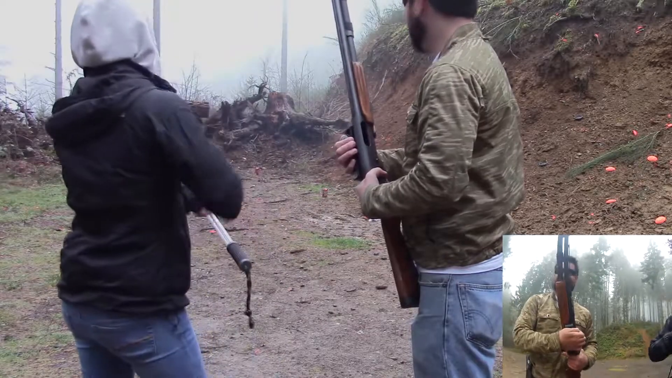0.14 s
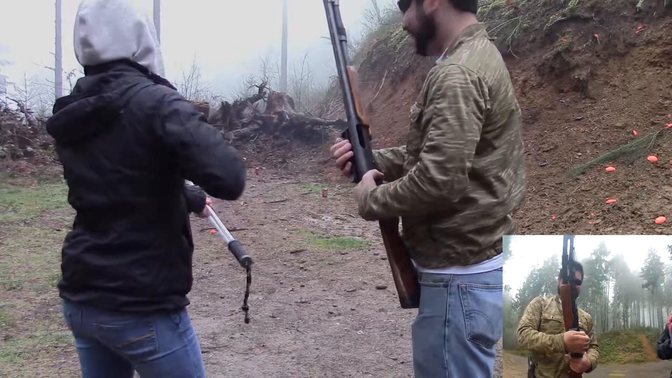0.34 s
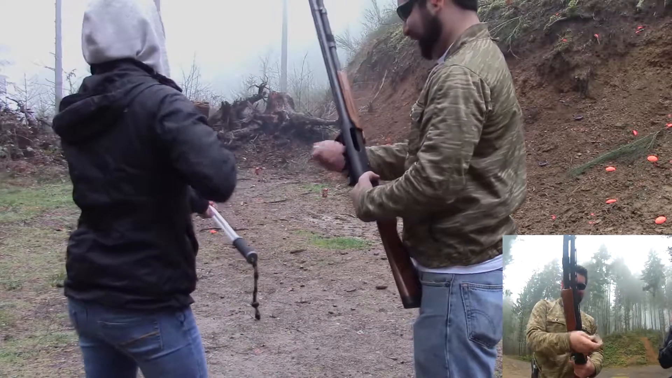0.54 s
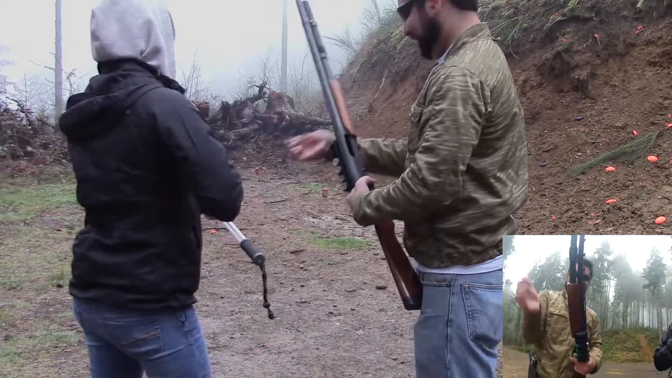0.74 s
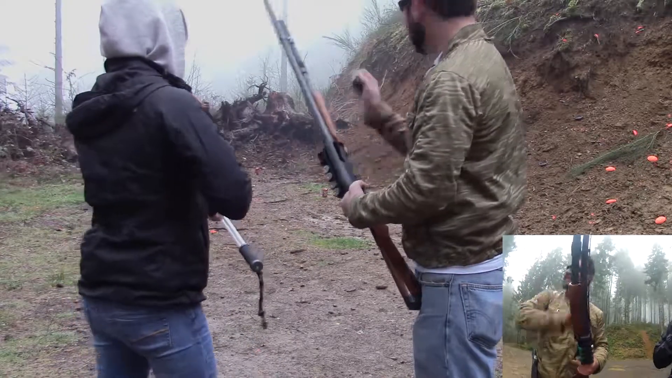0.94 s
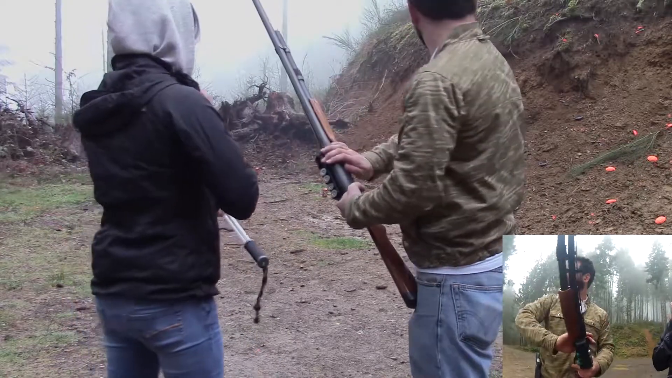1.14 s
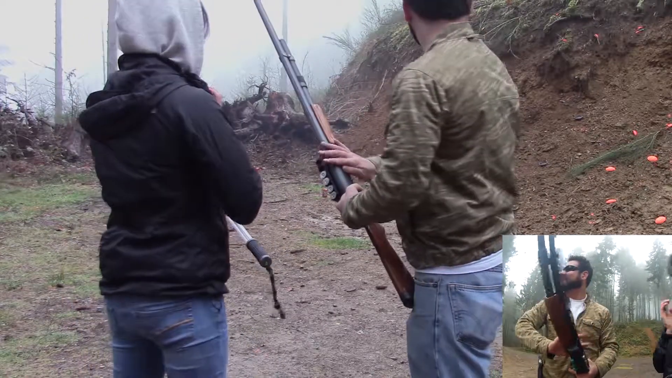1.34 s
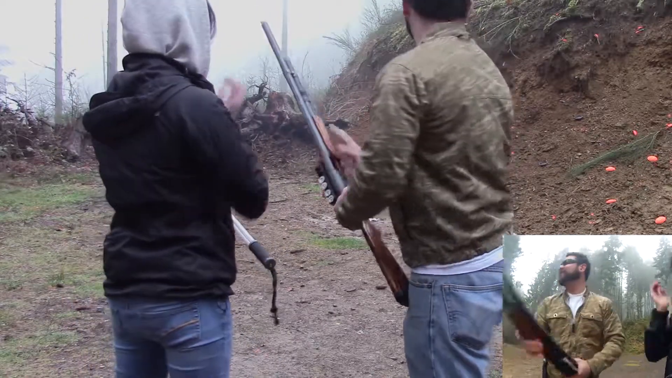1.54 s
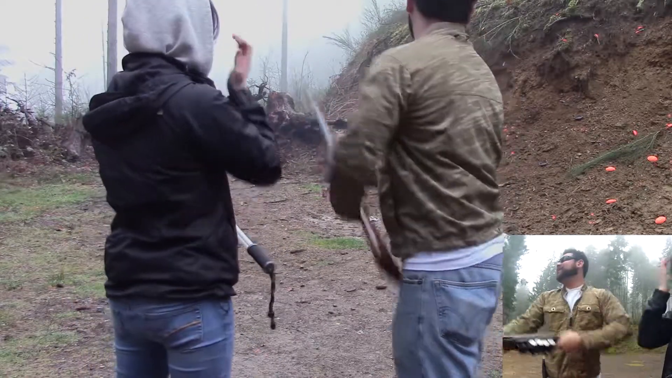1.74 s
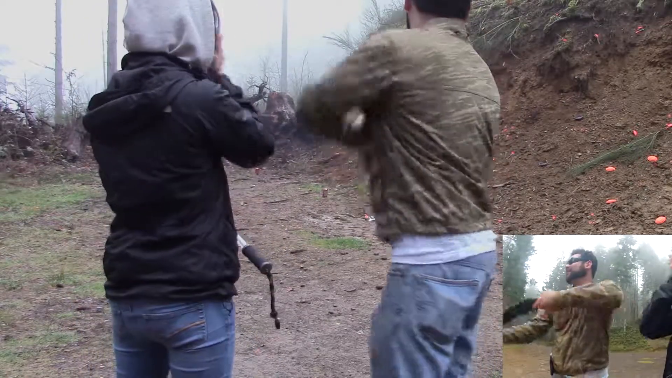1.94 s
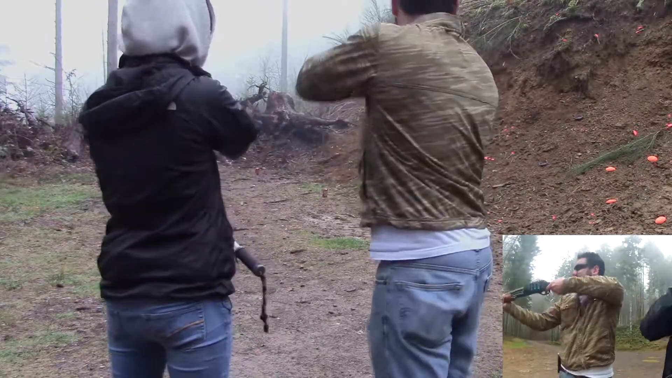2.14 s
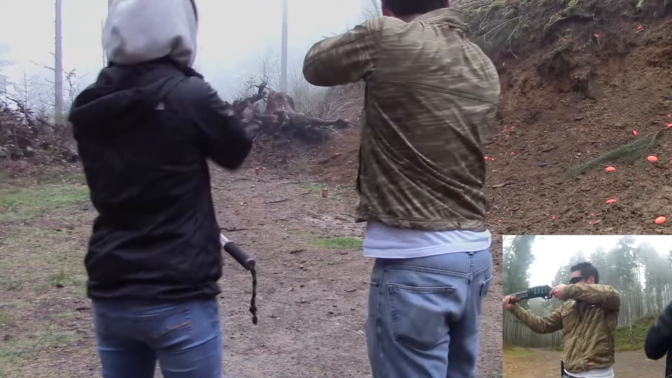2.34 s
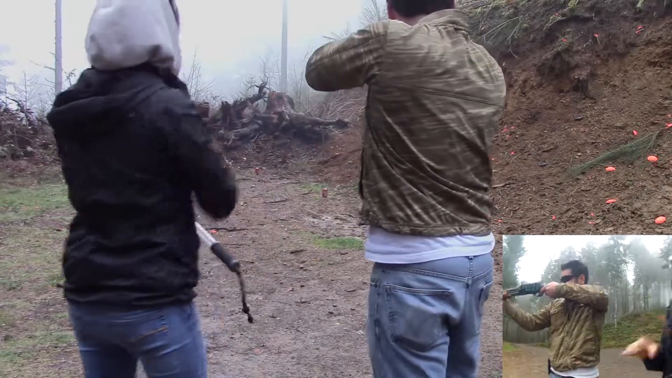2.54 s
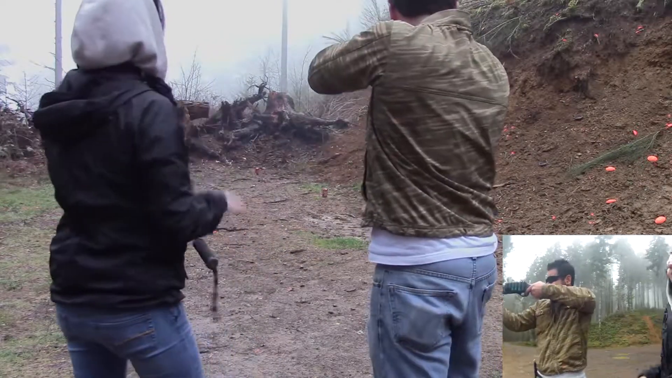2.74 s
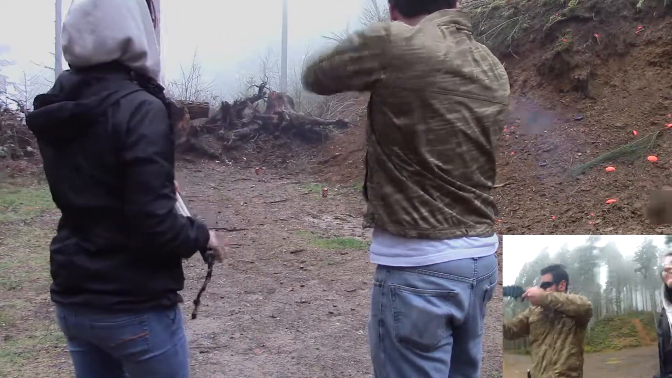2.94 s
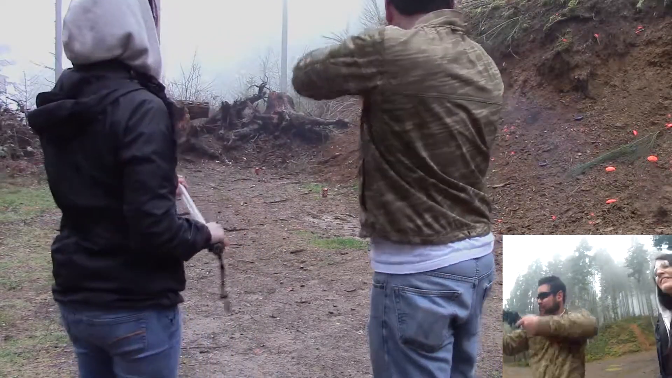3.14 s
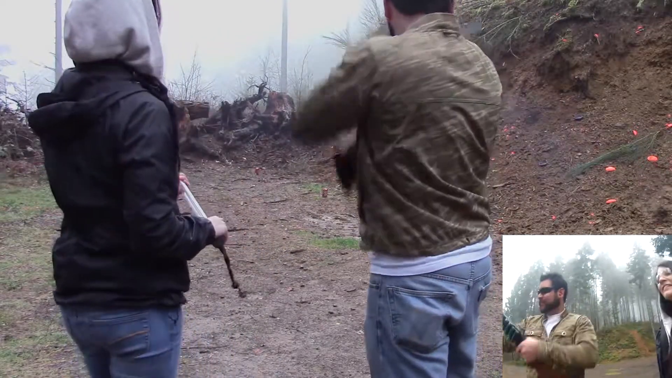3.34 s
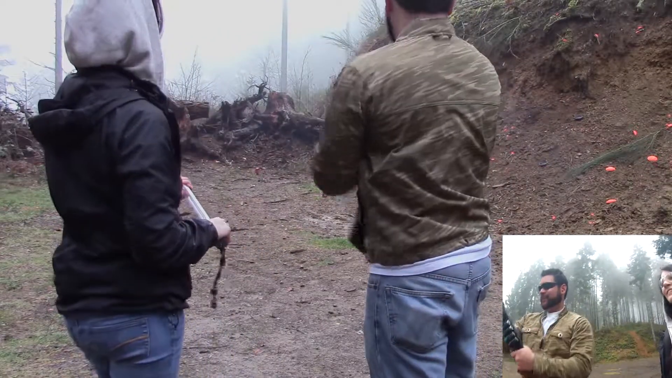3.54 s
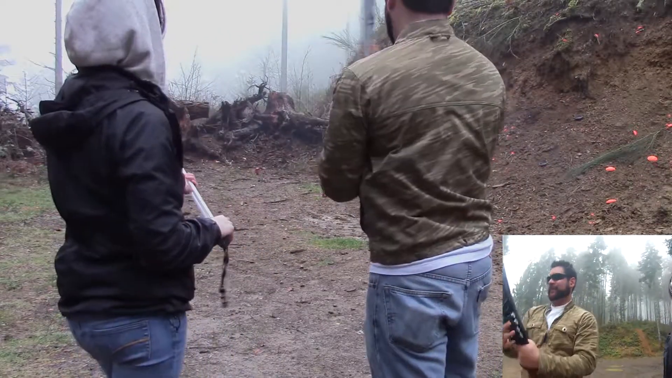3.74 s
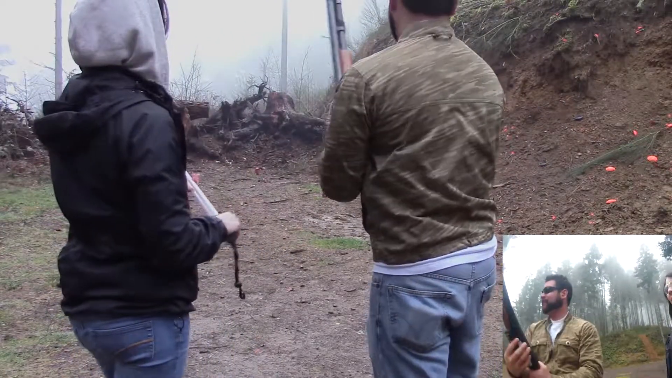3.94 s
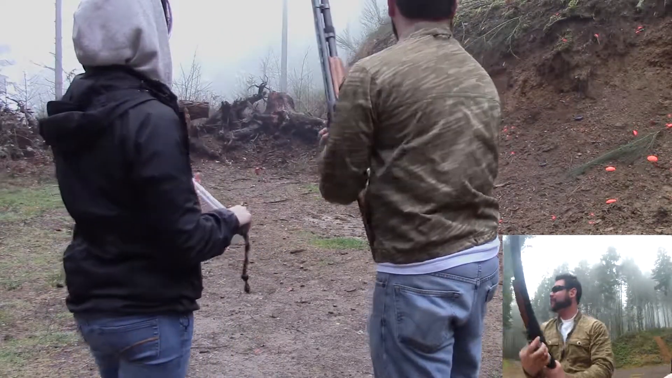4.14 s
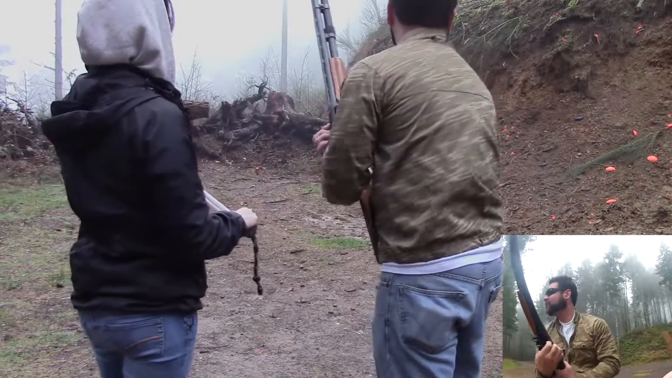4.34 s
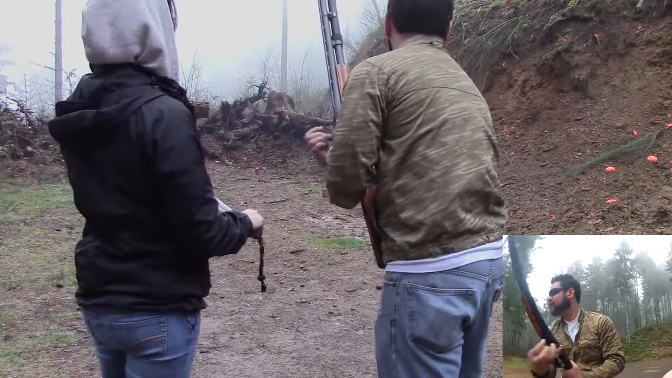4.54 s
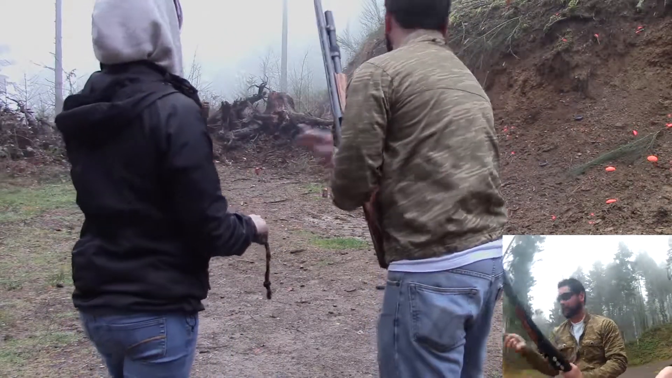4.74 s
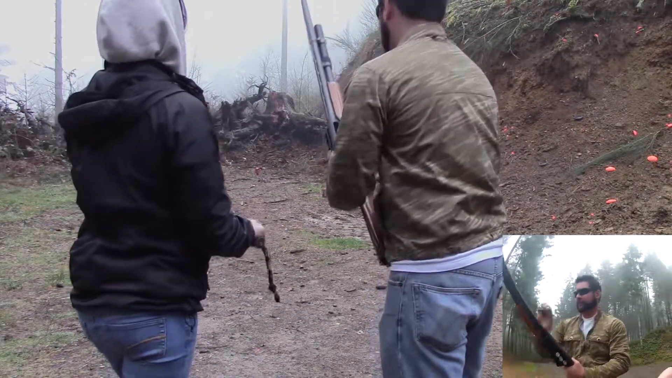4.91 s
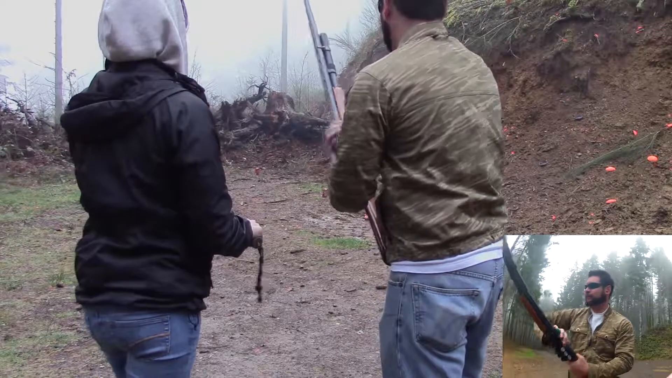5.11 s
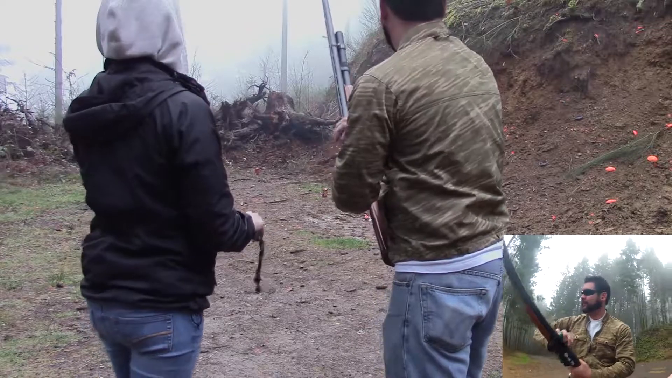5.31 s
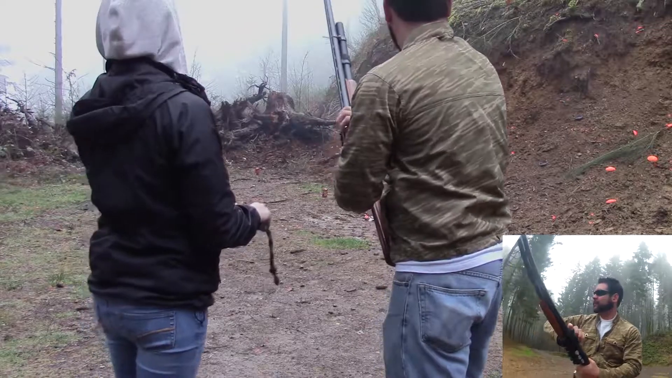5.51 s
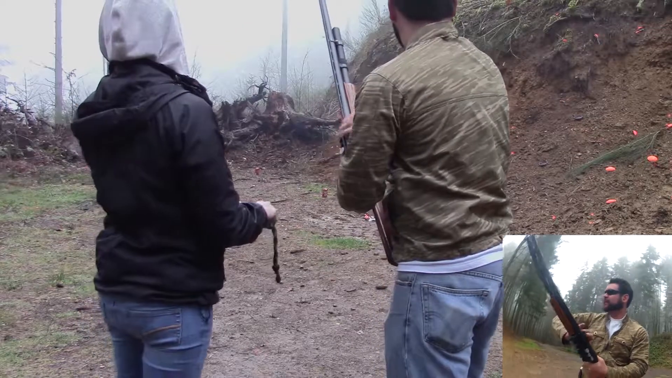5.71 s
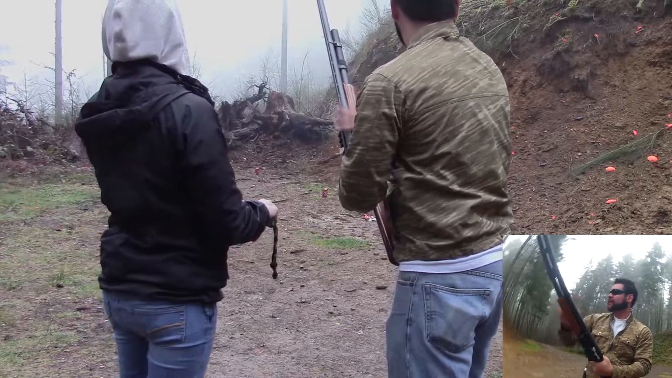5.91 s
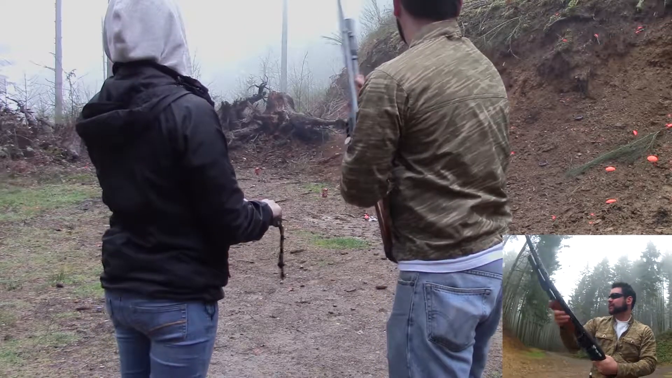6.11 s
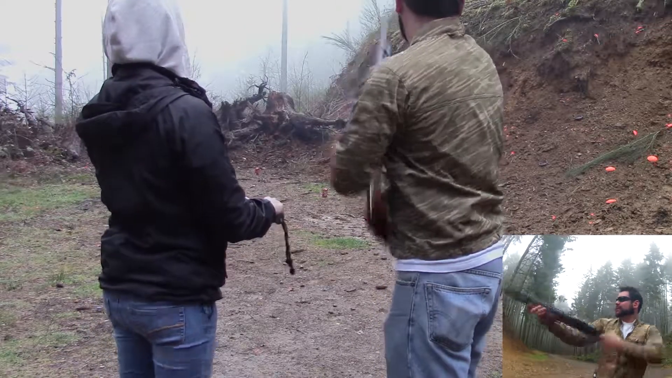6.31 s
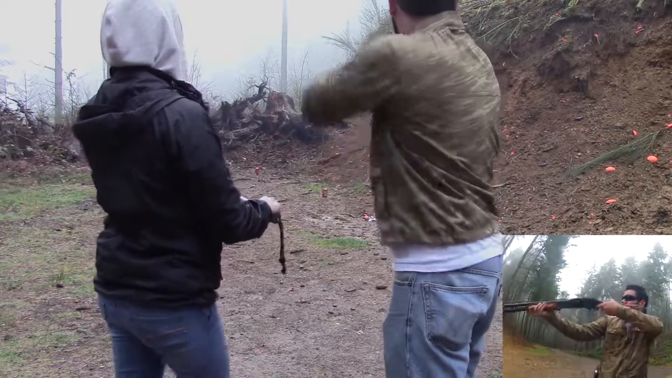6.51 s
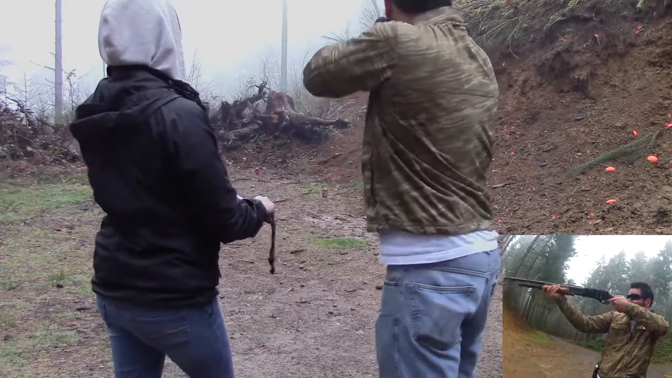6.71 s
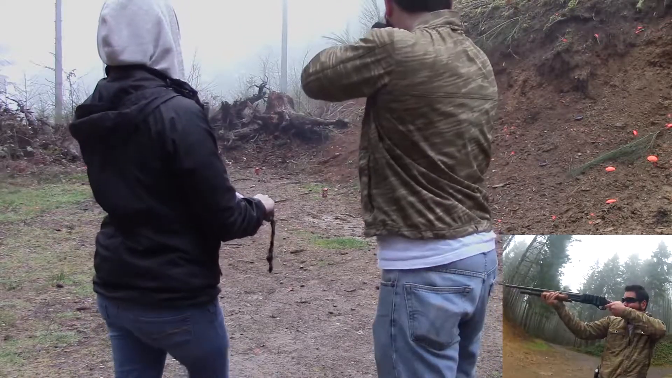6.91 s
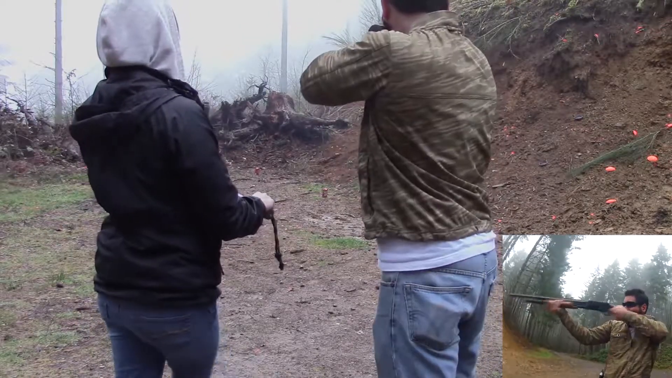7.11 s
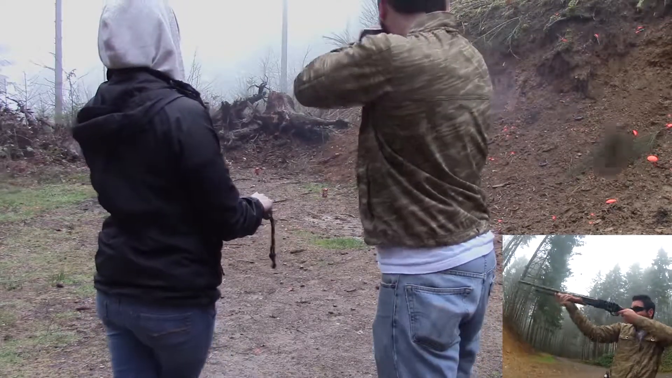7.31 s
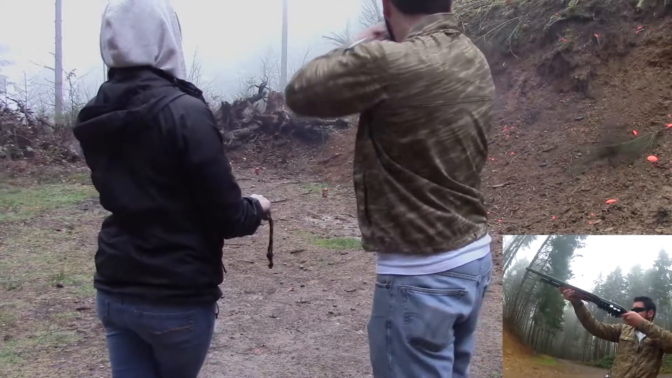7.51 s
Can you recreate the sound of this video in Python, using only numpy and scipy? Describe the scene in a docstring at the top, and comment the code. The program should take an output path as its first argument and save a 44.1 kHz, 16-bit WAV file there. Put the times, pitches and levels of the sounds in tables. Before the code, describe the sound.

In a quiet forest clearing, a pump shotgun is loaded with steel clicks and slammed shut. A jacket brushes faintly, then a blast overloads the microphone a few metres away and rolls off through the trees. The pump clacks open, more clicks and scrapes follow, and the action slams shut again before a second blast. A soft hush of air and leaves lies underneath.

```python
"""Two pump shotgun blasts in a forest clearing, a few metres away. Each overloads the microphone,
slaps back from the ground, an earth bank and trunks, and rolls off through the trees.
Around the shots the gun is loaded and racked: steel parts clack, scrape and ring, the whole gun
thumps, and a jacket brushes as it is shouldered. A quiet hush of air and leaves lies underneath."""
import sys
import numpy as np
from scipy import signal
from scipy.fft import rfft, irfft
from scipy.io import wavfile
from scipy.ndimage import uniform_filter1d

SR = 44100
rng = np.random.default_rng(int(sys.argv[2]) if len(sys.argv) > 2 else 0)


def unload_wav(signal):
    """Save mono or channel-first audio to the path in sys.argv[1] as 16-bit WAV at rate SR, clipped to [-1, 1]."""
    wavfile.write(
        sys.argv[1],
        SR,
        np.round(np.clip(np.atleast_2d(signal).T, -1, 1) * 32767).astype(np.int16),
    )


N = 333396
T = np.arange(N) / SR


def undb(db):
    """dB to gain."""
    return 10 ** (np.asarray(db) / 20)

def unit(x):
    """Scale to rms 1."""
    return x / np.sqrt(np.mean(x ** 2))

def colour(x, points):
    """Minimum-phase filter through (frequency [Hz], gain [dB]) points."""
    hz, db = np.transpose(points)
    size = 8192
    bins_hz = np.maximum(np.arange(size // 2 + 1) * SR / size, 1)
    cepstrum = irfft(np.interp(np.log(bins_hz), np.log(hz), db) * np.log(10) / 20)
    cepstrum[1:size // 2] *= 2
    cepstrum[size // 2 + 1:] = 0
    return signal.fftconvolve(x, irfft(np.exp(rfft(cepstrum))))[:len(x)]

def band(x, lo_hz, hi_hz):
    """Butterworth band-pass."""
    return signal.sosfilt(signal.butter(2, [lo_hz, hi_hz], "band", fs=SR, output="sos"), x)

def noises(*spectra):
    """One independent noise per spectrum, rms 1."""
    return np.array([unit(colour(rng.standard_normal(N), points)) for points in spectra])

def wander(rate_hz):
    """Random steps, smoothed twice."""
    hold = int(SR / rate_hz)
    steps = np.repeat(rng.standard_normal(N // hold + 1), hold)
    return 0.88 * uniform_filter1d(uniform_filter1d(steps, hold), hold)[:N]

def register_gains(hits):
    """Bass, mid and treble gain of each hit."""
    return [undb([bass_db, 0, treble_db]) for _, _, bass_db, treble_db, *_ in hits]

def bursts(hits, weights, rise_s, hold_share=0.1):
    """Rise, hold for a share of t60, decay: one envelope per weight column; powers add."""
    power = np.zeros((len(weights[0]), N))
    for (time_s, db, _, _, t60_s, *_), gains in zip(hits, weights):
        start = int((time_s - rise_s) * SR)
        hold_s = hold_share * t60_s
        t = T[:min(int(SR * (hold_s + 2 * t60_s)), N - start)]
        shape = np.minimum(t / rise_s, 1) * undb(db - 60 * np.maximum(t - rise_s - hold_s, 0) / t60_s)
        power[:, start:start + len(t)] += np.outer(gains, shape) ** 2
    return np.sqrt(power)

def envelopes(curves, fade_s):
    """Sum of gated (time [s], level [dB], ...) curves: one gain envelope per level column."""
    out = 0
    for times_s, *levels_db in map(np.transpose, curves):
        gate = np.clip(np.minimum(T - times_s[0], times_s[-1] + fade_s - T) / fade_s, 0, 1)
        out = out + gate * undb([np.interp(T, times_s, db) for db in levels_db])
    return out


# Air and leaves: (frequency [Hz], density [dB])
HUSH_SPECTRUM = [(18, -39.5), (30, -11), (81, -7.5), (192, -6), (237, -7), (342, -9.5), (445, -8),
                 (481, -18), (534, -10), (676, -11), (1110, -21.5), (1440, -21.5), (1740, -23),
                 (4690, -26.5), (15600, -37)]
def hush(level_db=-57.5):
    """Far air and leaves, wavering slightly."""
    return undb(level_db + wander(17)) * noises(HUSH_SPECTRUM)[0]

# Jacket swish: (time [s], level [dB])
JACKET_LEVELS = [(2.46, -59.5), (2.56, -55.5), (2.62, -51.5), (2.65, -58), (2.73, -60), (2.83, -60.5)]
# Rubbing cloth: (frequency [Hz], density [dB])
JACKET_SPECTRUM = [(300, -2), (1500, -1.5), (3000, -4.5), (5000, -3.5), (9000, -10), (14000, -19)]
def jacket():
    """Cloth brushes with a crumbly swish as the gun is shouldered."""
    crumple = undb(2.4 * wander(60) + 3.7 * wander(330))
    return crumple * envelopes([JACKET_LEVELS], fade_s=0.0206)[0] * noises(JACKET_SPECTRUM)[0]

def clearing(x, gain_db=-22.5, split_hz=5140, body_t60_s=1, treble_t60_s=0.6):
    """Diffuse return from bank and trunks; the treble dies first."""
    t = T[:SR]
    low, high = rng.standard_normal((2, SR)) * np.clip(t / 0.038, 0, 1)
    body = band(low, 270, split_hz) * undb(-60 * t / body_t60_s)
    treble = band(high, split_hz, 12000) * undb(4.5 - 60 * t / treble_t60_s)
    tail = body + treble
    return undb(gain_db) * signal.fftconvolve(x, tail / np.sqrt(np.sum(tail ** 2)))[:N]

def duck(x, half_gain_at_db=-15, recovery_s=0.0047):
    """Gain that dips briefly after peaks of x."""
    pole = np.exp(-1 / (recovery_s * SR))
    level = signal.lfilter([1 - pole], [1, -pole], np.abs(x))
    return 1 / (1 + level / undb(half_gain_at_db))

def loud_stereo_noise(x, full_scale_db=-25, exponent=2.6):
    """Faint noise that differs between the channels and rises steeply with loudness."""
    power = uniform_filter1d(np.clip(x, -1, 1) ** 2, size=400) + 1e-12
    return undb(full_scale_db) * unit(band(rng.standard_normal(N), 30, 9000)) * power ** (exponent / 2)

# Jolts of the whole gun: (time [s], level [dB], t60 [s])
JOLTS = [(1.766, -25, 0.051), (3.652, -18.5, 0.019), (3.922, -39, 0.047), (4.121, -40, 0.045),
         (5.799, -40, 0.15), (6.247, -38, 0.037)]
def thumps(pitch_hz=75.5):
    """Each slam or bump gives a damped push of air."""
    out = np.zeros(N)
    for time_s, db, t60_s in JOLTS:
        t = np.maximum(T - time_s, 0)
        out += 1.8 * undb(db - 60 * t / t60_s) * np.sin(2 * np.pi * pitch_hz * t)
    return out

# Spells of handling: (start [s], end [s], level [dB])
HANDLING = [(2.52, 2.74, -53), (3.8, 4.02, -39), (4.38, 4.8, -45), (5.17, 5.35, -44), (6.5, 6.7, -47)]
def ticks(per_spell=8, scatter_db=5, treble_db=-5, t60_s=0.012):
    """Loose parts tick at random times and spots on the steel; rows as in IMPACTS."""
    rows = []
    for start_s, end_s, db in HANDLING:
        for when, size, low, high in rng.random((per_spell, 4)):
            time_s = start_s + when * (end_s - start_s)
            level_db = db + scatter_db * (2 * size - 1)
            rows.append((time_s, level_db, 0, treble_db, t60_s, 350 + 400 * low, 1500 + 1500 * high))
    return rows

# Sliding parts: (start [s], length [s], first level [dB], last level [dB], bass [dB], treble [dB])
STROKES = [(1.358, 0.18, -50.5, -70, 4, -5), (1.676, 0.072, -44, -30.5, 1.5, 4),
           (1.791, 0.032, -29, -18.5, -13, -13), (3.582, .055, -32.5, -33, 0, 0),
           (5.059, 0.034, -25, -48, -7.5, -5.5), (5.102, 0.028, -58, -61, -25, 2.5),
           (5.551, 0.091, -54.5, -47.5, -17, -8.5), (5.686, 0.033, -47, -39, -7, -3),
           (5.745, 0.14, -37, -62, -1.5, 0.5), (5.931, 0.046, -55.5, -54, -2, -1.5),
           (6.166, 0.08, -38, -23, -5, -1), (6.266, 0.022, -36, -35, -16, -14)]
def slide_friction(stutter_db=2.5):
    """Bass, mid and treble envelopes of parts that catch and let go as they slide."""
    ramps = [[(start_s, first + bass, first, first + treble),
              (start_s + length_s, last + bass, last, last + treble)]
             for start_s, length_s, first, last, bass, treble in STROKES]
    return undb(4.5 * wander(300) + stutter_db * wander(40)) * envelopes(ramps, fade_s=0.0077)

# Resonances of receiver, slide and barrel: (frequency [Hz], gain [dB], t60 [s])
STEEL_MODES = [(375, -4.5, 0.1), (532, 1.5, 0.015), (650, 3.5, 0.035), (788, 2, 0.038), (1540, -1, 0.0062),
               (1730, -1.5, .015), (1954, 1.5, 0.014), (2130, -3, 0.0089), (2755, 0.5, 0.0078),
               (3035, -5, 0.036), (3440, -5, 0.0068), (3900, -17.5, .01), (4690, -0.5, 0.011),
               (5520, -0.5, 0.0033), (7270, -5.5, 0.015), (9060, -11, 0.0065), (11440, -12.5, 0.016),
               (12990, -12, 0.0087)]
def steel_ring(hits, friction, grit):
    """Hits and friction shake the steel; where a hit lands decides which modes answer."""
    modes_hz = np.array(STEEL_MODES)[:, 0]
    register = np.searchsorted([1000, 6000], modes_hz)
    width_oct = np.array([0.27, 0.27, 2])[register]
    weights = []
    for (*_, low_hz, high_hz), gains in zip(hits, register_gains(hits)):
        offset_oct = np.log2(modes_hz / np.array([low_hz, high_hz, 10000])[register])
        weights.append(gains[register] * np.exp(-(offset_oct / width_oct) ** 2))
    drives = grit * (0.27 * bursts(hits, weights, rise_s=0.0006) + 0.35 * friction[register])
    out = np.zeros(N)
    for drive, (hz, db, t60_s) in zip(drives, STEEL_MODES):
        radius = np.exp(-np.log(1000) / (t60_s * SR))
        shake = drive * rng.standard_normal(N) * np.sqrt(1 - radius ** 2)
        feedback = [1, -2 * radius * np.cos(2 * np.pi * hz / SR), radius ** 2]
        out += undb(db) * signal.lfilter([1, 0, -radius], feedback, shake)
    return out

# Clacks of shells, slide, bolt, hammer and sling:
# (time [s], level [dB], bass [dB], treble [dB], t60 [s], low mode focus [Hz], high mode focus [Hz])
IMPACTS = [(1.0615, -11.5, -1, -16, 0.014, 307, 2480), (1.0672, -8, -16.5, -3.5, 0.024, 690, 2500),
           (1.0784, -47, 19.5, 6.5, 0.082, 700, 1960), (1.1105, -11, -22, -10, 0.035, 686, 4600),
           (1.3081, -22, -26, -14, 0.016, 450, 4600), (1.315, -22, -15.5, -16.5, 0.038, 650, 4640),
           (1.3464, -31, -20.5, -9.5, 0.015, 608, 2000), (1.355, -24.5, -20.5, -.5, 0.061, 999, 4230),
           (1.368, -34.5, -3, -18.5, 0.06, 710, 1670), (1.3888, -19, -15.5, -20.5, 0.0053, 697, 2900),
           (1.4087, -32.5, -15.5, -2.5, 0.18, 626, 1560), (1.4567, -36, -28.5, 4, 0.093, 614, 1520),
           (1.6211, -33, 8, -3, 0.063, 542, 2050), (1.6662, -30, -9.5, -19, .09, 670, 2130),
           (1.6927, -19.5, -9, -12, 0.076, 657, 2980), (1.711, -15, -28, -9, 0.11, 705, 2460),
           (1.752, -4.5, -12.5, -12.5, 0.094, 794, 2300), (1.7644, -4.5, -3.5, -1, 0.042, 590, 2300),
           (1.7716, 2, -14, -10.5, 0.025, 398, 4300), (1.8174, -0.5, -14.5, 2.5, 0.049, 380, 3770),
           (1.8824, -30.5, 0, 2, .025, 620, 2500), (2.1, -37.5, 0, -31, 0.026, 446, 1766),
           (3.5927, -11.5, -13.5, -13.5, 0.024, 401, 2340), (3.5984, -12, -8, -20, 0.015, 598, 4560),
           (3.618, -27, -3, -13, 0.026, 330, 1777), (3.6414, -12.5, -18.5, -13, 0.02, 467, 2100),
           (3.6524, -1, -3.5, -15, 0.034, 560, 2080), (3.702, -20.5, -13.5, -2.5, 0.054, 678, 3300),
           (3.8227, -17.5, 2.5, -21, 0.0053, 760, 2340), (3.861, -25.5, 9, -21, 0.013, 780, 3200),
           (3.916, -28.5, 21, -9, 0.021, 820, 1930), (4.336, -24, -16, -13, 0.019, 429, 1515),
           (4.35, -32, -10.5, -6.5, .015, 430, 2300), (4.358, -29.5, -11, -10, 0.019, 301, 1340),
           (4.727, -39.5, -12.5, -2.5, 0.01, 607, 4600), (4.7352, -32, 12.5, 0, 0.038, 800, 2190),
           (5.0571, -14.5, -2, -12, 0.018, 693, 3450), (5.105, -36, -17.5, 2, 0.041, 637, 4270),
           (5.664, -38.5, -9, -5, 0.068, 598, 4790), (5.691, -35, -5, -16, 0.05, 654, 2680),
           (5.728, -17, -19, -7, 0.017, 661, 2260), (5.7344, -17.5, -13.5, -10.5, 0.024, 671, 4800),
           (5.7765, -34.5, 7.5, -15, 0.031, 690, 1860), (5.8252, -32, -8, -9, 0.028, 643, 2330),
           (5.8757, -43.5, -5.5, -11, .04, 415, 1570), (5.908, -34.5, 0.5, -22.5, .024, 689, 1720),
           (6.0716, -28, 0.5, -4.5, 0.033, 717, 4520), (6.0914, -36.5, 11, -16.5, 0.056, 447, 2110),
           (6.1392, -39.5, 0, -5.5, 0.096, 390, 2370), (6.1785, -23.5, -7.5, -20.5, 0.053, 654, 2650),
           (6.1929, -17, -14, -14, 0.035, 743, 3920), (6.2302, -15, -9, -8, .059, 684, 2700),
           (6.2441, 2, -3.5, -10.5, 0.034, 1002, 3000), (6.2786, -27.5, -16, 4.5, 0.031, 368, 4590),
           (6.2934, -10.5, -4, 4, 0.046, 334, 2345), (6.441, -33, -4.5, -8, 0.086, 610, 1875),
           (6.6683, -37, 1, -23.5, 0.017, 800, 1860), (6.6774, -43.5, -12, -20, .02, 600, 1800),
           (7.178, -30, -28, -3, 0.028, 602, 3010)]
# Part sliding in the receiver: (frequency [Hz], gain [dB])
SCRAPE_SPECTRUM = [(1100, -10), (1700, -7), (2600, -0.5), (3700, -1), (4750, 2.5), (5900, -9.5),
                   (7400, 1.5), (8500, -1.5), (10000, 4.5), (12000, -10), (14500, 0)]
def pump_action():
    """Steel parts strike and scrape; returns contact rattle and ring, equally weighted."""
    friction = slide_friction()
    hits = IMPACTS + ticks()
    grit = undb(3.1 * wander(1200))
    ring = steel_ring(hits, friction, grit)
    knocks = 0.37 * bursts(hits, register_gains(hits), rise_s=0.00058)
    white = rng.standard_normal(N)
    scrape = colour(white, SCRAPE_SPECTRUM)
    rattle = np.zeros(N)
    for knock, slide, edges_hz in zip(knocks, friction, [(220, 787), (1100, 7900), (6000, 21000)]):
        rattle += grit * knock * unit(band(white, *edges_hz))
        rattle += grit * slide * unit(band(scrape, *edges_hz))
    return np.sqrt(0.5) * rattle, np.sqrt(0.5) * ring

# Swell and decay of the roll: (time after shot [s], level [dB])
ROLL_CURVE = [(0.046, -27.5), (.125, -5), (.17, -3), (.23, -1.5), (0.341, 0), (.6, -6), (.87, -11.5),
              (1.5, -22), (3.1, -41)]
# Rumble, mid, treble and air bands: (top level [dB], curve steepness [ratio])
ROLL_REGISTERS = [(-22.5, 0.97), (-28.5, 1.27), (-27, 1.67), (-40.5, 1.37)]
# Rumble band: (frequency [Hz], density [dB])
RUMBLE_SPECTRUM = [(18, -66.5), (30, -37), (70, -16), (134, 0), (202, -0.5), (259, 2), (453, -2), (598, 2),
                   (1000, -14.5), (1300, -31), (1500, -41.5)]
def forest_roll():
    """Each shot rolls through the trees as a lumpy rumble that dulls with distance."""
    shared_db = wander(30)
    per_band_db = np.array([0.82 * wander(40), wander(51), wander(81), 0.63 * wander(77)])
    curves = [[(shot_s + delay_s, *(top_db + steepness * db for top_db, steepness in ROLL_REGISTERS))
               for delay_s, db in ROLL_CURVE] for shot_s, *_ in BLASTS]
    bands = noises(RUMBLE_SPECTRUM,
                   [(600, -32), (950, -3.5), (2300, -4), (3200, -26)],
                   [(1900, -27), (2600, -2), (4700, -10), (6200, -14)],
                   [(6000, -17.5), (7400, -0.5), (10000, -11.5), (16000, -8)])
    return np.sum(undb(shared_db + per_band_db) * envelopes(curves, fade_s=0.011) * bands, axis=0)

# Near surfaces, ground, bank and trunks: (delay [s], level [dB], bass [dB], treble [dB], t60 [s])
REFLECTORS = [(.0085, -12, -1, -4, 0.071), (.022, -15.5, 2, -20, .07), (0.0358, -14, 2, -10, .06),
              (.046, -5.5, 2.5, -6, 0.047), (0.0517, 2.5, 1.5, 0, .04), (0.0639, -10.5, 8, -4.5, .055),
              (.073, -6.5, -10, -1.5, .055), (.084, -1, -2.5, -12, .045), (.0915, -3.5, 1.5, -5, 0.041),
              (.101, -7, -10, -10.5, .05), (.112, -8, 3, -14, 0.075)]
# Effect of each shot's aim on its slaps: (gain [dB], slope over delay [dB/s], time shift [s])
SHOT_AIMS = [(0.5, -2.5, .0015), (-2, -47, -.0022)]
def slapback():
    """The same near surfaces return each blast as sharp, grainy bursts."""
    echoes = [(shot_s + shift_s + delay_s, db + aim_db + slope_db_per_s * delay_s, bass, treble, t60_s)
              for (shot_s, *_), (aim_db, slope_db_per_s, shift_s) in zip(BLASTS, SHOT_AIMS)
              for delay_s, db, bass, treble, t60_s in REFLECTORS]
    grain = 0.41 * undb(2 * wander(600))
    levels = bursts(echoes, register_gains(echoes), rise_s=0.0013, hold_share=0.08)
    bands = noises([(100, -18.5), (400, 7), (800, -2), (1400, -29.5)],
                   [(600, -10.5), (1000, 2.5), (1800, 1), (3000, -3.5), (4500, -4), (7000, -18)],
                   [(4000, -14.5), (6000, 3), (9500, -3), (11500, -5), (16000, -4.5)])
    return np.sum(grain * levels * bands, axis=0)

# Muzzle blasts: (time [s], swing level [dB], swing rate [Hz], length [s], crack level [dB])
BLASTS = [(2.9024, 5, 440, .0104, -2), (7.1995, 9, 430, .0086, -11)]
def muzzle_blasts():
    """A crack, huge swings over a suction, then the microphone membrane settles from the other side."""
    out = np.zeros(N)
    for time_s, swing_db, swing_hz, length_s, crack_db in BLASTS:
        t = T - time_s
        gate = np.clip(t / 0.00074 + 1, 0, 1) * np.clip((length_s - t) / 0.0002 + 1, 0, 1)
        suction = -0.4 - 0.45 * np.cos(3.4 * t / length_s)
        swings = suction - np.cos(2 * np.pi * swing_hz * t + 1.2 * wander(500))
        after_s = np.maximum(t - length_s, 0)
        settle = 0.5 * np.minimum(after_s / 0.001, 1) * np.exp(-after_s / 0.0045)
        crack_gate = np.exp(np.clip(t, -1, 0) / 0.00031) * np.clip((length_s - t) / 0.00083 + 1, 0, 1)
        crack = undb(crack_db) * crack_gate * unit(band(rng.standard_normal(N), 800, 4800))
        out += undb(swing_db) * gate * swings + settle + crack
    return out

# Far sound, hollow near 6 and 12 kHz: (frequency [Hz], gain [dB])
FAR_RESPONSE = [(4800, 0.5), (5600, -6), (6400, -5), (7400, -0.5), (10500, -2.5), (11400, 1.5),
                (12000, -6.5), (12700, 1.5), (14000, 0.5)]
def scene():
    """The channels differ only by faint hush, return and noise at loud moments."""
    rattle, ring = pump_action()
    steel = rattle + ring
    reverb = clearing(rattle + 0.4 * ring)
    foreground = steel + thumps() + muzzle_blasts() + slapback()
    background = reverb + jacket() + colour(forest_roll() + hush(), FAR_RESPONSE)
    mid = foreground + duck(steel) * background
    side = loud_stereo_noise(mid) + undb(-18) * band(hush(), 20, 8000)
    side += undb(-22.5) * band(clearing(rattle), 3000, 12000)
    return np.array([mid + side, mid - side])

# Microphone in its housing: (frequency [Hz], gain [dB])
MIC_RESPONSE = [(1000, -2.5), (1300, -3), (2500, -1), (4600, -2), (5900, -5), (7500, -1), (10000, 1),
                (11300, -4), (12000, -5), (12700, -5.5), (14500, -4), (16000, -5.5)]
TOP_CUT_HZ = 15500
def record(dry):
    """Housing colour, hard clip, steep low-pass."""
    clipped = np.clip([colour(channel, MIC_RESPONSE) for channel in dry], -1, 1)
    return signal.sosfilt(signal.ellip(10, 0.2, 80, TOP_CUT_HZ, fs=SR, output="sos"), clipped)


dry = scene()
out = record(dry)
unload_wav(out)
```